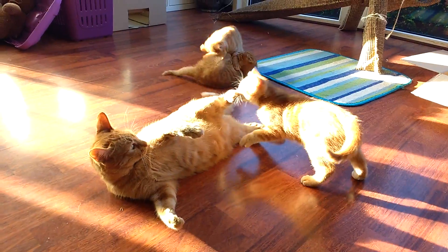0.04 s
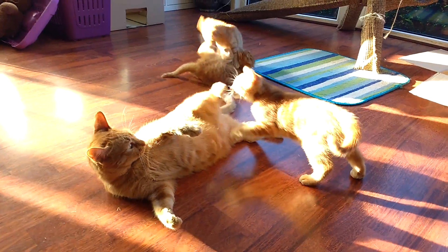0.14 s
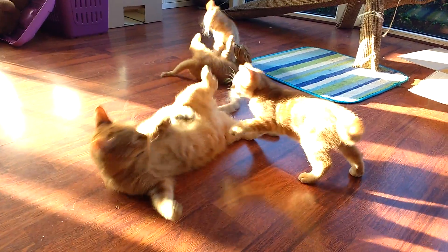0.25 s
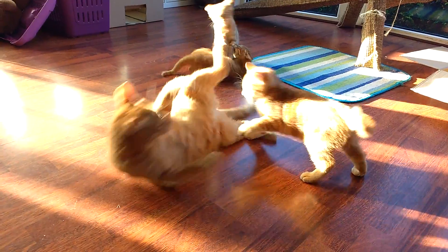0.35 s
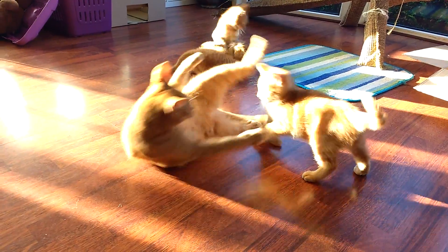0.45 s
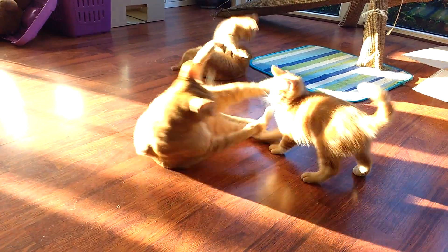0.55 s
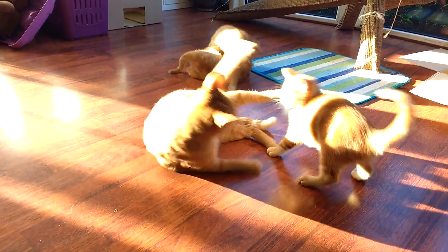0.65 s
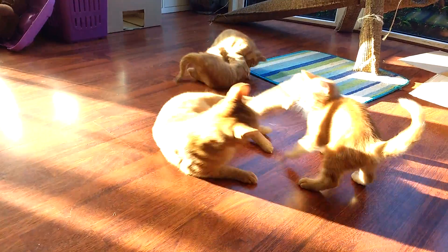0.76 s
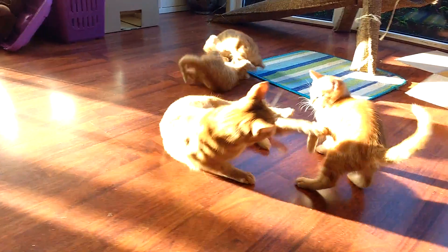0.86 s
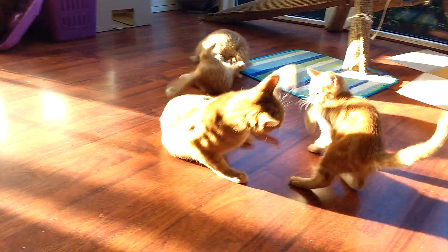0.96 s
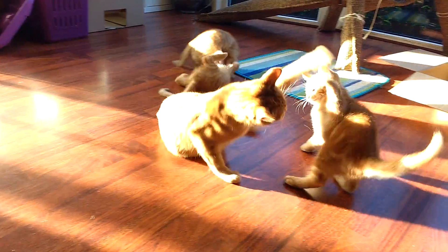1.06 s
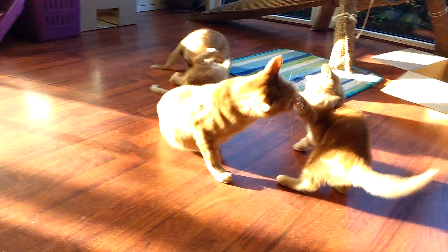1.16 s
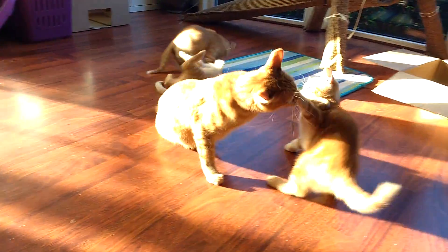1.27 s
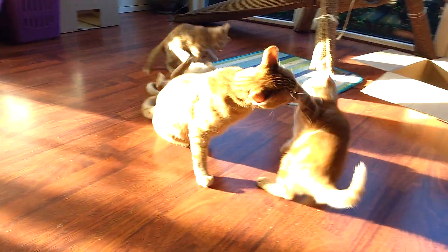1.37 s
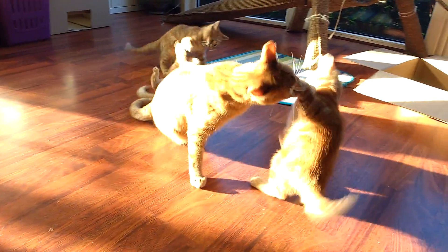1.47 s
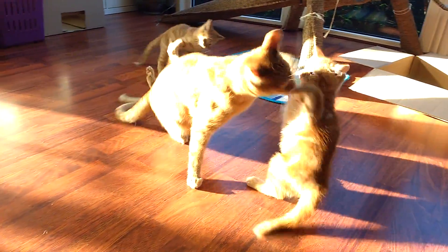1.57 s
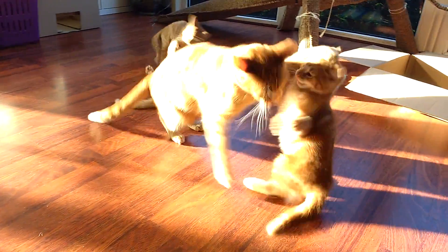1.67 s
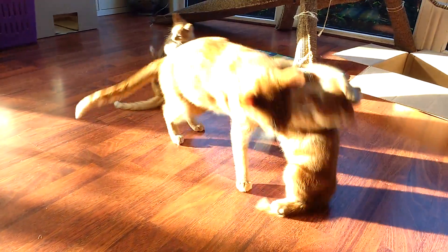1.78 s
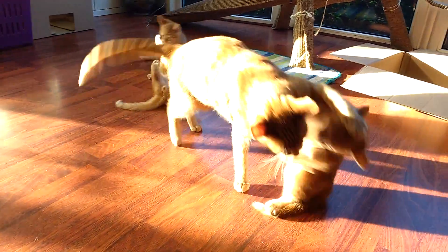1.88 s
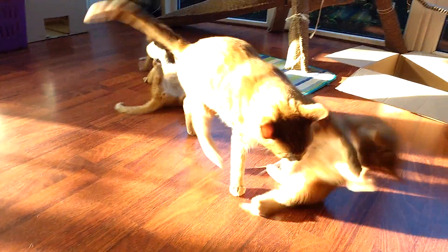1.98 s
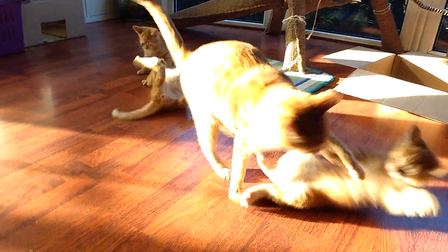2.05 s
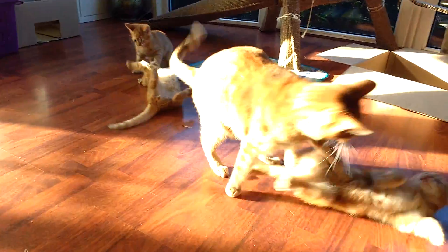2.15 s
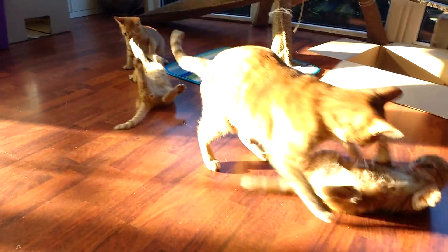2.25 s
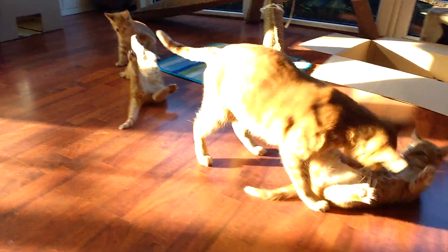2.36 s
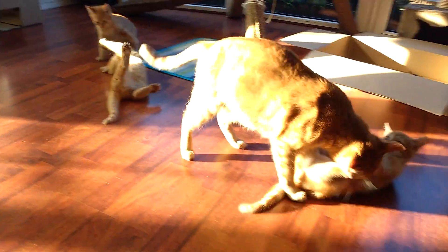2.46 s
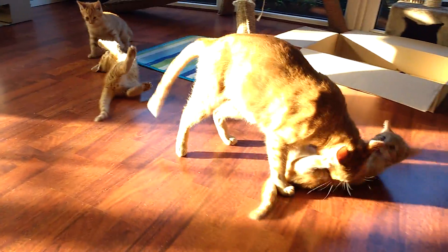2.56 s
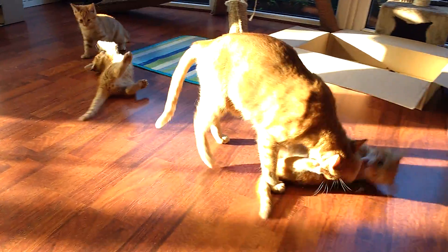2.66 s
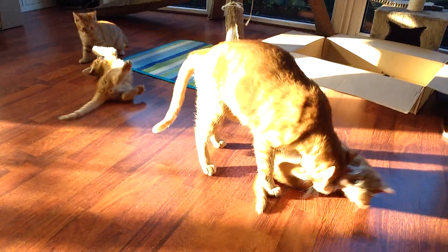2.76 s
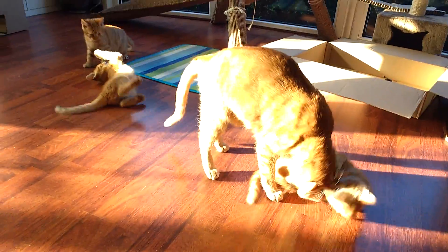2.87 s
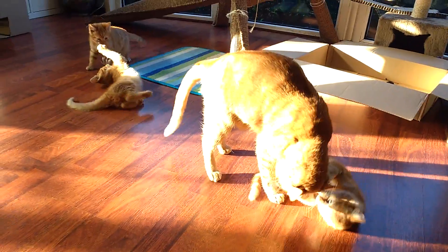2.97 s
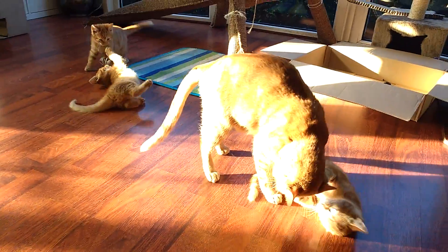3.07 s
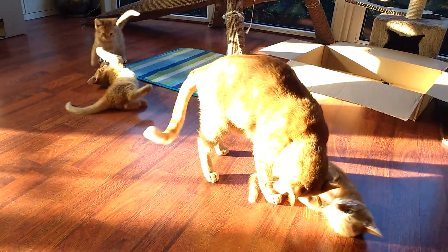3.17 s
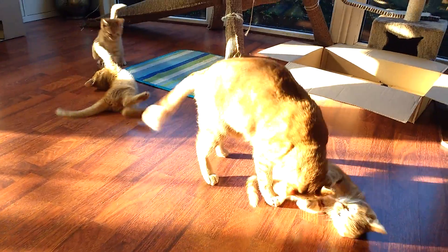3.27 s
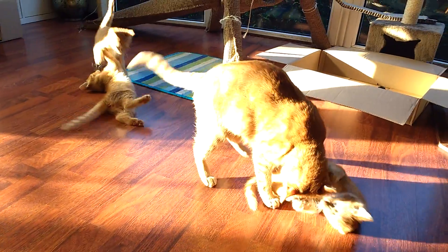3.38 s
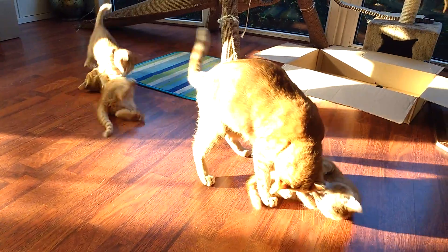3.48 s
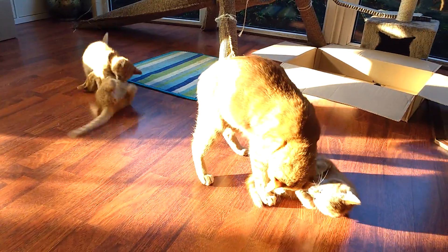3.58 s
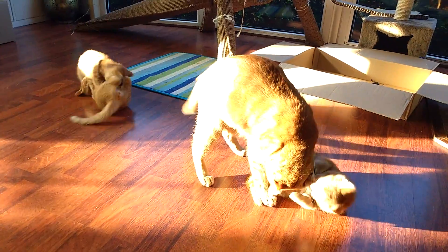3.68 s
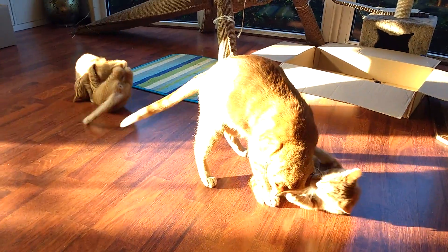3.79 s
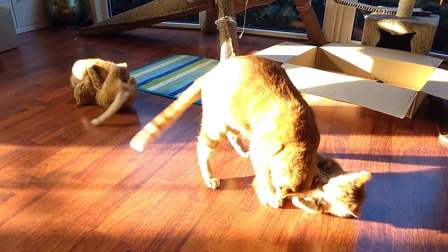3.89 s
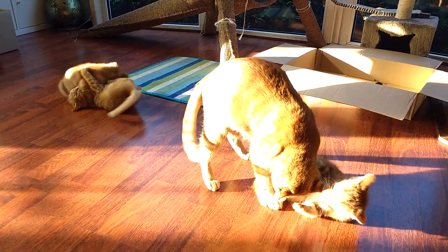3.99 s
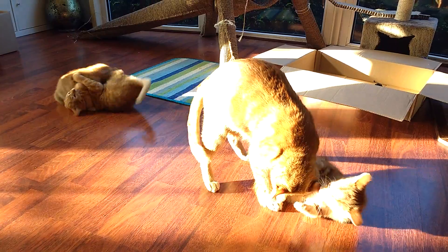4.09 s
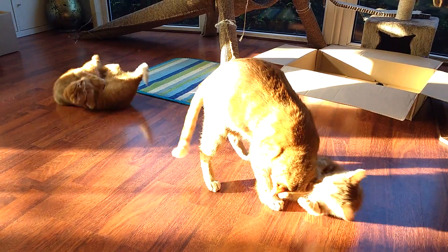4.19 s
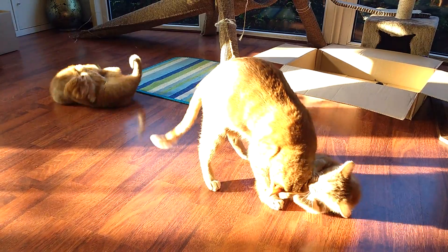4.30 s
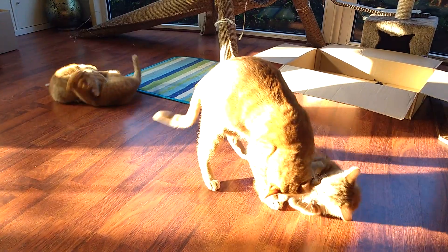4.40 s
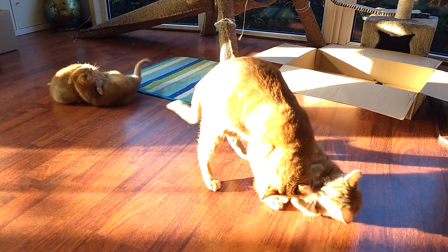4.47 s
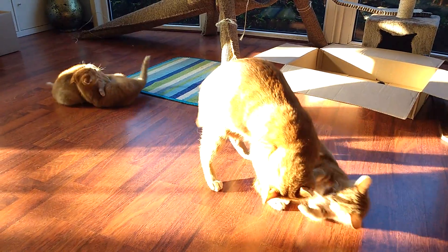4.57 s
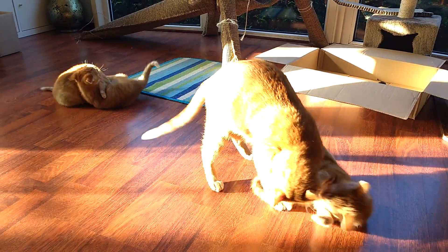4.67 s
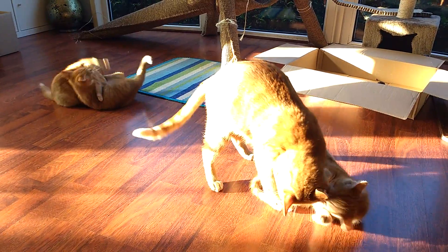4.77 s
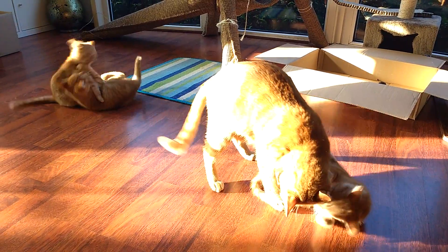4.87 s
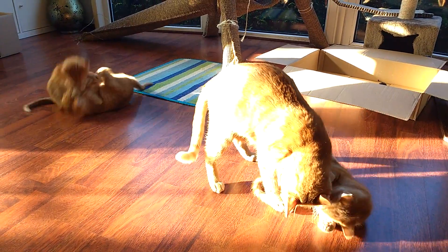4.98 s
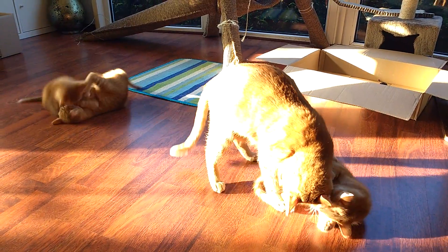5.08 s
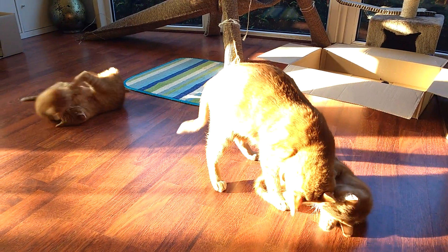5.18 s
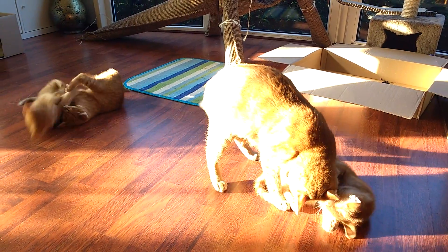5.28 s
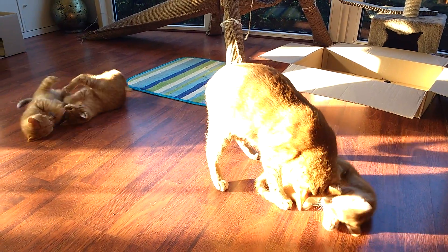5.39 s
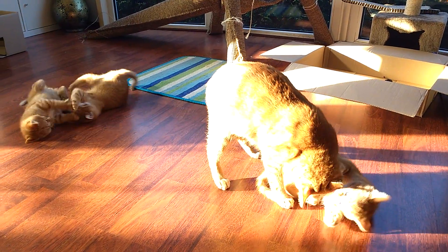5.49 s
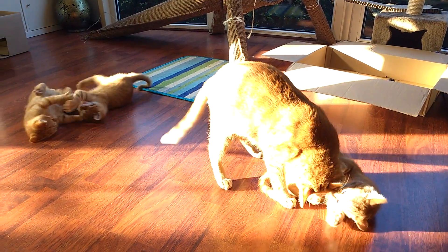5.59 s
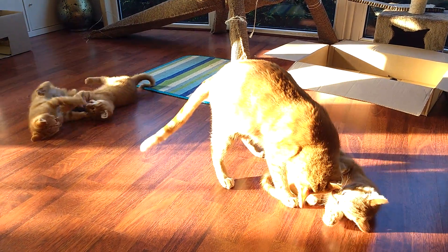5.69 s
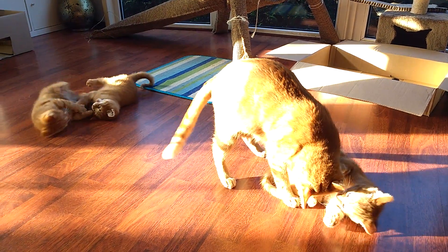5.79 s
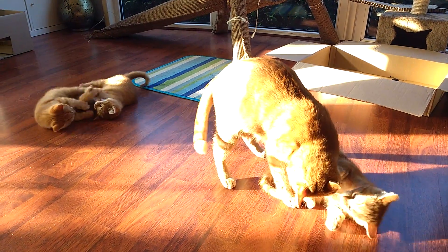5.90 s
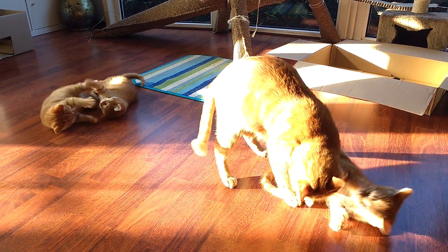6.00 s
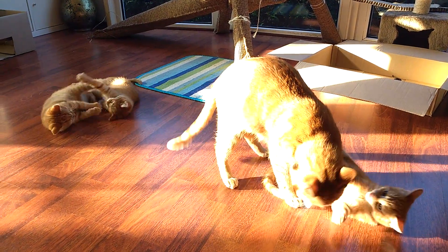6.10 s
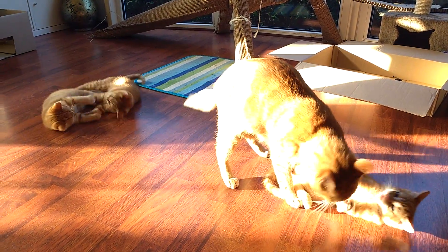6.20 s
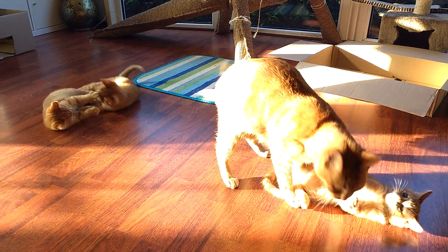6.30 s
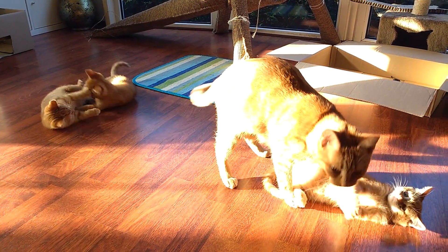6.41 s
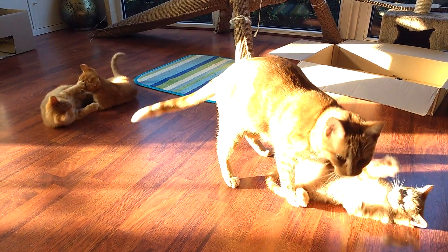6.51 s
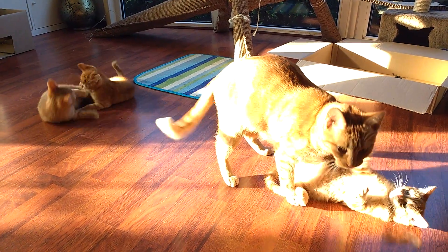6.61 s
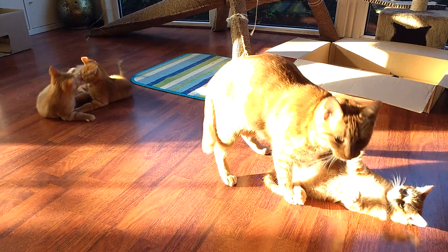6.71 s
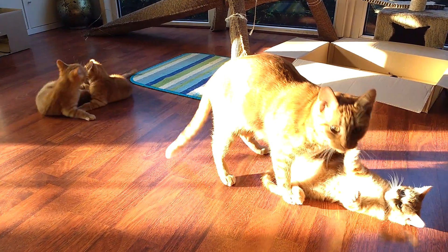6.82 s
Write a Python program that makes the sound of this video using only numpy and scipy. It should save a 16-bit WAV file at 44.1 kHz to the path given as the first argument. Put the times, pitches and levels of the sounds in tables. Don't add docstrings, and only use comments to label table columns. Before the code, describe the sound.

Close stereo pickup of cats play-fighting on a varnished wooden floor indoors. Irregular padded thuds ring through the boards, mixed with dry claw ticks, brief scratchy skids and low body landings. The liveliest scrabbling comes between two and three seconds; then knocks and shuffles thin out. A low flop near five seconds and a crisp bony crack near six stand out above faint air hiss.

```python
import sys
import numpy as np
from scipy import signal
from scipy.fft import rfft, irfft, next_fast_len
from scipy.io import wavfile
from scipy.ndimage import uniform_filter1d

SR = 44100
rng = np.random.default_rng(int(sys.argv[2]) if len(sys.argv) > 2 else 0)


def master_out(mix):
    frames = np.transpose(np.atleast_2d(mix))
    ceiling = np.clip(frames, -1, 1)
    pcm = np.round(ceiling * 32767).astype(np.int16)
    wavfile.write(sys.argv[1], SR, pcm)


def undo_db(level):
    steps = np.asarray(level, float) / 20
    return 10 ** steps


N = 302085
PORT_GAP_S = 0.00053


def evened(x):
    return x / np.sqrt(np.mean(x ** 2) + 1e-20)


def read(points, hz):
    f, value = np.transpose(points)
    return np.interp(np.log(hz + 1), np.log(f + 1), value)


def add(mix, s, sound):
    part = mix[round(s * SR):][:len(sound)]
    part += sound[:len(part)]


def resonance(x, hz, width_hz):
    return signal.lfilter(*signal.iirpeak(hz, hz / width_hz, SR), x)


def diffuse(z, hz):
    same = .995 * np.sinc(2 * hz * PORT_GAP_S)[:, None]
    return np.array([z[0], same * z[0] + np.sqrt(1 - same ** 2) * z[1]])


def hiss(spectrum, patchy_db, flicker_db, size):
    hop, hz = size // 2, np.fft.rfftfreq(size, 1 / SR)
    a, b, c, d, patch = rng.standard_normal((N // hop + 5, len(hz), 5)).T
    patch = uniform_filter1d(patch, size // 80, axis=0)
    patch = evened(uniform_filter1d(patch, 3000 // hop, axis=1))
    flicker = rng.standard_normal(a.shape[1])
    level_db = read(spectrum, hz)[:, None] + patchy_db * patch + flicker_db * flicker
    z = diffuse([a + 1j * b, c + 1j * d], hz) * undo_db(level_db)
    return evened(signal.istft(z, nperseg=size, noverlap=size - hop)[1][:, :N])


def lags(pan_db):
    side = np.clip(pan_db / 17.9, -1, 1)
    return PORT_GAP_S * np.array([1 - side, 1 + side]) / 2


def blows(rows, rise_cycles):
    near, sends = np.zeros((2, N)), np.zeros((4, N))
    t = np.arange(3000) / SR
    for k, (s, db, hz, cycles, send_db, pan_db) in enumerate(rows):
        for port, lag_s in enumerate(lags(pan_db)):
            turns = np.maximum(t - lag_s, 0) * hz
            onset = 1 - np.exp(-(turns / rise_cycles) ** 2)
            decay = np.exp(-2.3 * turns / max(cycles, .3))
            swing = -np.sin(2 * np.pi * turns) * onset * decay
            swing *= undo_db(db) / abs(swing).max()
            add(near[port], s, swing)
        add(sends[k % len(sends)], s, undo_db(send_db) * swing)
    return near, sends


def scratches(rows):
    near, sends = np.zeros((2, N)), np.zeros((4, N))
    t = np.arange(10000) / SR
    grit_db, rise_share = 2.2, .027
    fade_out = signal.windows.tukey(2 * len(t), .15)[len(t):]
    for k, (s, db, low_hz, high_hz, t60_s) in enumerate(rows):
        noise, other, grit = rng.standard_normal((3, len(t)))
        long = np.clip(t60_s / 0.05, 0, 1)
        pair = np.array([noise, np.sqrt(1 - long) * noise + np.sqrt(long) * other])
        burst = pair * undo_db(long * grit_db * evened(uniform_filter1d(grit, size=70)))
        band_hz = [low_hz, min(high_hz, 16000)]
        burst = signal.sosfilt(signal.butter(2, band_hz, "bandpass", fs=SR, output="sos"), burst)
        envelope = (1 - np.exp(-t / (rise_share * t60_s))) * undo_db(-60 * t / t60_s) * fade_out
        burst = undo_db(db - 7.5) * evened(burst) * envelope
        add(near[0], s, burst[0])
        add(near[1], s + PORT_GAP_S * .2, burst[1])
        add(sends[k % len(sends)], s, undo_db(-7.0) * burst[0])
    return near, sends


# f/Hz, level/dB per Hz
AIR = [(40, -38), (70, 4.5), (100, 6.5), (180, -19), (330, -8), (500, -20.5), (1000, -9), (1700, -14.5),
       (3000, -12), (5500, -13), (9000, -25), (11000, -26.5), (15500, -17)]


def air():
    return undo_db(-56.5) * hiss(AIR, 1.0, 0.07, size=1024)


# t/s, level/dB
VIGOUR = [(0.0, -4), (0.63, -2.5), (1.1, 5), (1.3, 0.5), (1.73, 3.5), (1.96, 7.5), (2.1, 1.5), (2.23, 7.5),
          (2.5, -3.5), (2.65, 8), (3.05, -2.5), (3.55, -2), (3.83, -2), (4.65, 2), (5.04, -2.5), (5.9, 0),
          (6.42, -8), (6.7, -1.5)]


def vigour_db():
    return np.interp(np.arange(N) / SR, *np.transpose(VIGOUR))


# f/Hz, level/dB
SHUFFLE = [(60, 3), (110, 5), (200, -0.5), (330, -3.5), (520, -4.5), (900, -15), (1500, -31.5)]


def paws():
    shuffle = undo_db(-54.5 + vigour_db()) * hiss(SHUFFLE, 1.0, 1.44, size=1024)
    return shuffle + undo_db(1) * resonance(shuffle, 310, width_hz=41)


# f/Hz, level/dB
SLIDE = [(300, -8), (600, -6.5), (1000, 3), (1700, -2), (2500, -1), (4000, -18.5)]
# middle t/s, length/s, level/dB
SLIDES = [(0.552, 0.76, -57.5), (1.11, 0.4, -57), (1.44, 0.45, -52.5), (2.21, .2, -73),
          (2.427, 0.22, -47.5), (2.74, 0.97, -57), (3.34, 0.47, -52), (3.704, 0.29, -50.5),
          (3.964, 0.57, -57.5), (4.66, 0.47, -57.5), (5.925, .3, -57.5), (6.758, 0.88, -62.5)]


def slide():
    drag = undo_db(-61 + 0.92 * vigour_db())
    for s, length_s, db in SLIDES:
        add(drag, s - length_s / 2, undo_db(db) * np.hanning(round(length_s * SR)))
    return drag * hiss(SLIDE, patchy_db=1.8, flicker_db=1.7, size=512)


# f/Hz, level/dB
FUR = [(1500, 7.5), (2800, 5.5), (5500, 1), (9000, 2.5), (11000, -1), (15500, -22)]


def fur():
    return undo_db(-57.5 + 0.66 * vigour_db()) * hiss(FUR, patchy_db=.8, flicker_db=0.75, size=256)


PAW_RISE_CYCLES = .5
PAW_PAN_DB = 13.5
THUMP_DB = 0.5
# t/s, peak level/dB, push f/Hz, room send level/dB
SLAPS = [(0.417, -38, 288, -2.5), (0.511, -34.5, 430, -3), (0.798, -39, 310, -1.5), (1.003, -39, 333, 5),
         (1.109, -34.5, 313, -2), (1.178, -35, 204, -6), (1.419, -31, 320, 0), (1.744, -36.5, 270, -0.5),
         (1.758, -37, 436, 1.5), (1.877, -34, 317, -3), (2.415, -31, 333, 2.5), (2.48, -34.5, 322, -4.5),
         (2.655, -34.5, 305, 5), (3.229, -34, 199, -4), (3.242, -35.5, 280, 6.5), (3.389, -42.5, 415, 9),
         (3.428, -33, 289, -2.5), (4.354, -44, 325, 6.5), (5.468, -33, 306, 0.5), (5.809, -40, 274, 2.5),
         (5.87, -49, 340, -5), (5.949, -44, 377, 0.5)]


def slaps():
    rows = [(s, db, hz, 0.43, send_db, PAW_PAN_DB) for s, db, hz, send_db in SLAPS]
    near, sends = blows(rows, PAW_RISE_CYCLES)
    return undo_db(THUMP_DB) * near, sends


# f/Hz, width/Hz, level/dB
BOARDS = [(91, 19, 0.5), (143, 20, -15), (213, 13, -6), (308, 35.6, 6), (423, 26, 6.5), (559, 64, -0.5),
          (746, 200, -4.5), (1056, 170, 0.5)]


def boards(push):
    return sum(undo_db(db) * resonance(push, hz, width_hz) for hz, width_hz, db in BOARDS)


# f/Hz, t60/s
ROOM = [(80, 0.59), (210, 0.26), (560, 0.31), (1470, 0.25), (3880, 0.2)]


def room(sends):
    wet = 0
    for x in sends:
        taps = np.zeros((2, 30000))
        at = np.arange(50, 29980, 20) + rng.integers(0, 20, (2, 1497))
        np.put_along_axis(taps, at, rng.choice([-1., 1.], at.shape), 1)
        hz, t, z = signal.stft(taps, SR, nperseg=512, noverlap=448)
        z = diffuse(z, hz) * undo_db(-60 * t / read(ROOM, hz)[:, None])
        tail = signal.istft(z, SR, nperseg=512, noverlap=448)[1]
        tail[:, :50] = 0
        wet = wet + signal.fftconvolve(x[None], tail / np.linalg.norm(tail[0]), axes=1)[:, :N]
    return wet


# t/s, peak level/dB, push f/Hz, room send level/dB
STEPS = [(0.486, -47, 300, 3), (0.574, -35.5, 284, -6), (0.659, -17, 340, -10), (0.734, -39, 240, -9),
         (0.862, -47, 299, -1.5), (1.05, -40, 220, 3), (1.327, -47, 340, 10), (1.626, -41, 310, -8),
         (1.957, -53, 447, -24), (1.982, -33.5, 300, 1), (2.029, -47, 281, -16), (2.291, -45, 380, -0.5),
         (2.679, -32, 280, -1), (2.73, -53, 292, 4), (2.855, -45.5, 315, -0.5), (2.968, -49, 280, 4.5),
         (3.279, -30, 302, 0), (3.594, -42.5, 200, 6.5), (4.251, -35.5, 288, -5.5), (4.466, -41, 320, -12),
         (4.7, -36, 246, 0), (4.919, -47.5, 476, 0), (5.076, -43, 470, -4), (5.337, -23, 240, -3),
         (6.165, -23.5, 280, -8), (1.03, -38, 330, -6), (3.246, -34, 300, -8), (3.294, -33, 310, -12),
         (3.309, -30, 310, -12), (3.411, -37, 330, -8), (3.44, -36, 300, -8), (3.464, -38, 230, -8),
         (4.27, -40, 300, -10), (4.385, -41, 320, -8), (4.64, -43, 300, -6), (4.684, -40, 300, -6),
         (5.476, -33, 320, -8)]


def steps():
    rows = [(s, db, hz, 2.04, send_db, PAW_PAN_DB) for s, db, hz, send_db in STEPS]
    near, sends = blows(rows, PAW_RISE_CYCLES)
    return undo_db(THUMP_DB) * near, sends


# t/s, peak level/dB, push f/Hz, ring/cycles, room send level/dB
KNOCKS = [(1.3549, -27.5, 350, 1.5, 2), (2.1132, -3.5, 556, 0.43, -7), (2.584, -36, 230, 1.9, -3),
          (3.6339, -19, 714, 1.13, 2), (3.6459, -20, 430, 2.5, -5), (6.1556, -12.5, 1750, 0.62, -8),
          (6.1572, -23, 520, 1.9, -20), (6.1556, -14, 4800, 0.51, -6), (.7355, -35, 680, 0.95, -8),
          (0.74, -45, 630, 0.88, -7), (.509, -35.5, 400, 1.6, -8), (4.917, -44, 520, 1.2, 0),
          (.7935, -40, 620, 1.2, -3), (1.7605, -33, 640, 1.2, -8), (3.5975, -43, 770, 1.3, 0),
          (5.076, -46, 620, 1.3, 2), (2.123, -19, 560, 1.8, -8), (3.2262, -39, 630, 1.2, 3),
          (3.9, -44, 640, 1.4, -4), (3.6585, -23, 620, 2, -8), (3.682, -28, 560, 2, -8),
          (5.472, -38, 620, 3, -4), (5.479, -43, 950, 4, -4), (4.385, -46, 700, 2, -3)]


def knocks():
    near, sends = blows([(*row, 2.44) for row in KNOCKS], rise_cycles=0.12)
    return undo_db(2.5) * near, sends


# t/s, peak level/dB, push f/Hz, room send level/dB, left over right level/dB
FLOPS = [(0.513, -38.5, 117, 2.5, 4), (0.665, -23.5, 164, -2, 1), (0.699, -36, 93, -8, -10),
         (0.799, -41, 107, -3, 3), (1.772, -28, 99.5, -6, 4), (1.953, -37.5, 120, -3, 11),
         (2.125, -27, 165, -20, -3.5), (2.149, -29, 153, -12, -3), (2.32, -41.5, 138, -12, 7),
         (3.231, -48, 125, 5, 10), (3.498, -40, 123, -11, 4), (3.657, -47, 109, 5.5, 0),
         (4.918, -42.5, 119, -3, 3), (5.042, -36.5, 101, -5, 7), (5.111, -41, 90, -7, 0),
         (5.341, -19, 135, -16, 5), (5.363, -21.5, 140, -8, -6), (5.397, -20.5, 96.5, -19, 2),
         (5.428, -26, 115, -19, -4), (6.159, -31, 143, -7, -2)]


def flops():
    rows = [(s, db, hz, 2.44, send_db, pan_db) for s, db, hz, send_db, pan_db in FLOPS]
    near, sends = blows(rows, PAW_RISE_CYCLES)
    return undo_db(THUMP_DB) * near, sends


# t/s, peak level/dB, lowest f/Hz, highest f/Hz, t60/s
SNAPS = [(.535, -36.5, 3000, 12000, 0.036), (.648, -47, 2800, 9000, 0.042), (.793, -39, 3020, 14000, .05),
         (1.3553, -30, 2500, 15000, 0.013), (2.0254, -16, 3400, 11000, 0.0063),
         (2.0275, -25, 3160, 9450, 0.019), (2.039, -31, 6000, 14000, .015), (2.42, -25, 2000, 14000, 0.012),
         (2.0256, -30, 5200, 5900, 0.025), (2.124, -32, 5000, 14000, 0.014),
         (2.187, -55, 4000, 9000, 0.025), (2.2785, -23, 2000, 15500, 0.0037),
         (2.5834, -37, 1800, 8650, 0.025), (2.605, -32, 3000, 15000, .008),
         (2.4258, -30, 3000, 15000, .008), (2.714, -36, 5000, 12000, .01), (2.92, -38.5, 5000, 9900, 0.076),
         (3.259, -37, 2000, 9000, 0.07), (3.632, -32, 3000, 9500, .02), (3.824, -37, 10500, 15500, .012),
         (3.834, -42, 10300, 15350, .012), (3.856, -40, 8500, 13000, .012), (4.785, -40, 2500, 9000, 0.053),
         (6.1557, -22, 4500, 12800, 0.0046)]


def snaps():
    return scratches(SNAPS)


# t/s, peak level/dB, claw f/Hz, ring/cycles, room send level/dB
TICKS = [(0.6473, -44.5, 3490, 1.6, 8), (0.652, -58, 3820, 2.1, 3), (0.7944, -54, 1800, 0.59, 14.5),
         (1.3551, -45, 1850, 2.1, 12.5), (2.1131, -34, 1830, 0.41, 6), (2.2663, -50, 1730, 1.9, 0),
         (2.2732, -46, 1810, 0.71, -16), (2.278, -41.5, 2060, 2, 9), (2.5836, -43.5, 2150, 1, 11.5),
         (2.6799, -49.5, 2120, 0.85, 17.5), (.536, -50, 1510, 0.73, 0), (6.1555, -35, 5400, 1.2, -6),
         (3.6323, -36, 2960, 0.63, 17), (4.285, -51.5, 3600, 2.2, 0), (4.6952, -52.5, 1830, 0.55, 17)]


def ticks():
    near, sends = blows([(*row, 4.84) for row in TICKS], rise_cycles=0.33)
    return undo_db(18.5) * near, undo_db(9) * sends


# t/s, peak level/dB, lowest f/Hz, highest f/Hz, t60/s
SKIDS = [(1.02, -43.5, 2500, 12000, 0.16), (1.357, -39.5, 3000, 15000, 0.28),
         (1.419, -37, 2500, 15000, 0.1), (1.738, -42.5, 2500, 12000, 0.2), (1.901, -47, 5900, 14000, 0.95),
         (2.03, -32.5, 3500, 12500, 0.27), (2.029, -33, 2650, 3900, 0.12), (2.262, -33, 2000, 8350, 0.3),
         (2.384, -33, 3830, 15500, 0.28), (2.414, -31, 1970, 15500, 0.15), (2.589, -32, 1800, 8300, 0.12),
         (2.673, -36, 2000, 15500, 0.2), (2.712, -38.5, 6000, 7900, 0.22), (3.643, -36, 3000, 10100, 0.062),
         (4.385, -48, 2500, 9850, 0.078), (4.692, -48, 2000, 12000, 0.48), (4.958, -47, 3500, 6000, 0.17),
         (5.40, -45, 4000, 12000, 0.17), (5.465, -46.5, 3000, 12000, 0.22), (6.159, -38, 2500, 5000, 0.25),
         (6.16, -36, 700, 2300, .4), (2.116, -40, 2000, 5000, .3), (6.17, -38, 960, 2340, 1.33),
         (6.19, -45, 1740, 2050, 2.2), (6.331, -44, 1200, 3430, 0.35)]


def skids():
    return scratches(SKIDS)


# t/s, peak level/dB, f/Hz, ring/cycles, room send level/dB
CHIRPS = [(2.0252, -30, 3500, 6, -6), (2.0252, -28, 5900, 9, -6), (2.0255, -29, 9100, 14, -6),
          (2.0273, -29, 3500, 8, -3), (2.0275, -28, 9200, 14, -6), (2.0276, -31, 5700, 9, -6),
          (2.031, -39, 3200, 9, -3), (2.1128, -33, 3700, 4, 0), (2.2727, -37, 3800, 4, -6),
          (2.2783, -31, 3500, 4, -6), (2.2786, -33, 9000, 7, -10), (2.2786, -35, 6500, 5, -10),
          (2.376, -45, 3600, 5, -6), (2.4188, -35, 2100, 3, -6), (2.419, -38, 12500, 9, -10),
          (2.4258, -37, 13000, 8, -10), (2.4258, -38, 3600, 4, -6), (2.5832, -37, 6600, 8, -6),
          (2.598, -41, 3700, 6, -6), (2.7485, -41, 6800, 8, -6), (3.2605, -43, 6700, 9, -6),
          (3.371, -36.5, 3620, 5, -10), (3.3805, -34, 3450, 6, -10), (3.3883, -44, 3500, 5, -10),
          (3.632, -28, 3800, 5, -8), (6.1553, -27, 8700, 5, -12), (6.1553, -33, 11300, 6, -12),
          (2.0258, -33, 4500, 7, -6), (2.0262, -33, 8200, 12, -6)]


def chirps():
    return blows([(*row, .8) for row in CHIRPS], rise_cycles=2.6)


# t/s, f/Hz, level/dB
SQUEAK = [
    (3.9, 14400, -81),
    (3.93, 14350, -71),
    (4.0, 14350, -71),
    (4.05, 14850, -73),
    (4.09, 15050, -70),
    (4.12, 14600, -70),
    (4.15, 14000, -85),
]


def squeak():
    s, hz, db = np.transpose(SQUEAK)
    t = np.arange(N) / SR
    phase = 2 * np.pi * np.cumsum(np.interp(t, s, hz)) / SR
    whistle = undo_db(np.interp(t, s, db, -200, -200)) * np.sin(phase)
    return whistle * np.array([[.4], [1]])


def scene():
    dry = air() + paws() + slide() + fur() + squeak()
    sends = np.zeros((4, N))
    for pushes in (slaps, steps, knocks, flops):
        near, send = pushes()
        dry += near
        sends += send
    sends += undo_db(-0.5) * boards(sends)
    for claws in (snaps, ticks, skids, chirps):
        near, send = claws()
        dry += near
        sends += send
    return dry + room(sends)


def band_limit(x):
    return signal.sosfilt(signal.butter(12, 16510, fs=SR, output="sos"), x)


CROSS_DELAY_S = 17.655 / 44100
# f/Hz, level/dB
PORT_BALANCE = [(60, 3), (1000, 3), (8000, -3), (10000, -0.5), (15500, -8.5)]
# f/Hz, level/dB
CROSS = [(100, -.2), (2500, -1.1), (5000, -4.5), (7600, -5), (10000, -11), (15500, -16)]
# t/s, left over right level/dB
BASS_LEAN = [(0, 1), (.67, -3.5), (.95, 4), (1.45, 3), (1.76, .3), (2.0, 3.5), (2.115, -4), (2.17, 3), (2.7, 5),
             (3.4, 1.5), (4.0, 3), (4.25, .5), (4.7, 4.5), (5.36, -.3), (5.47, 5), (6.05, 3), (6.16, -4),
             (6.3, 1.5)]


def record(dry):
    size = next_fast_len(N + 8192)
    hz = np.fft.rfftfreq(size, 1 / SR)
    balance = undo_db(read(PORT_BALANCE, hz) / 2)
    ports = rfft(dry, size) * [balance, 1 / balance]
    cross = undo_db(read(CROSS, hz) + [[-1.5], [1.5]])
    sides = ports - ports[::-1] * cross * np.exp(-2j * np.pi * hz * CROSS_DELAY_S)
    shelf = 0.7 * (1j * hz + 560) / (1j * hz + 150)
    low_cut = (1j * hz / (1j * hz + 50)) ** 3
    edge = np.where(hz > 15660, undo_db(-42), 1)
    sides = sides * shelf * low_cut * edge
    lean = undo_db(np.interp(np.arange(N) / SR, *np.transpose(BASS_LEAN)) / 2)
    bass = irfft(sides / (1 + (hz / 550) ** 4), size)[:, :N]
    mix = irfft(sides, size)[:, :N] + bass * [lean - 1, 1 / lean - 1]
    return band_limit(mix)


dry = scene()
out = record(dry)
master_out(out)
```